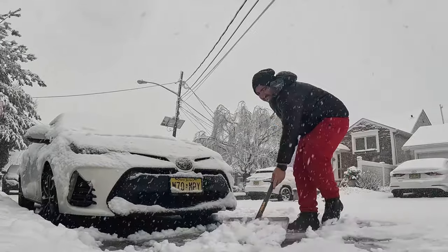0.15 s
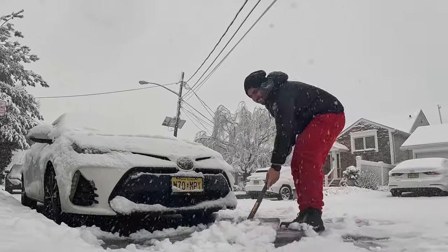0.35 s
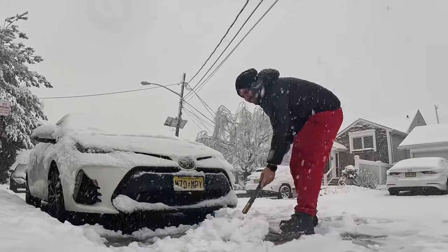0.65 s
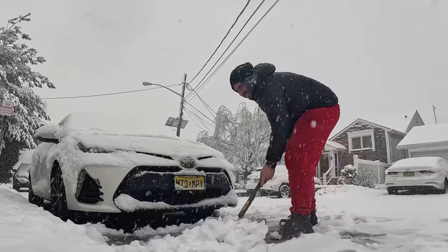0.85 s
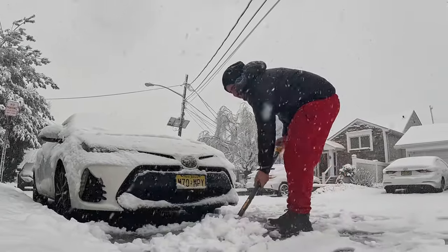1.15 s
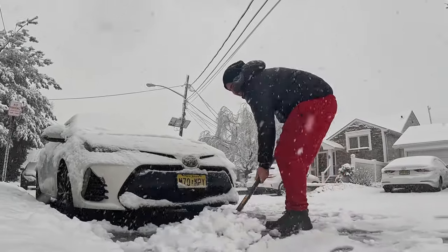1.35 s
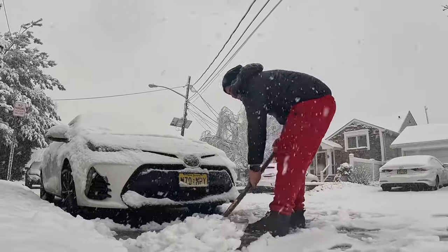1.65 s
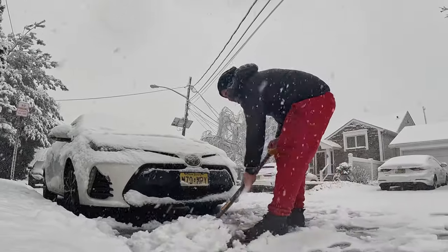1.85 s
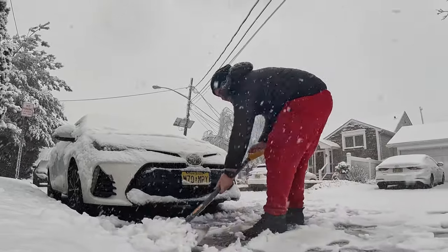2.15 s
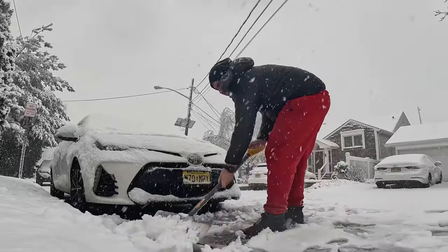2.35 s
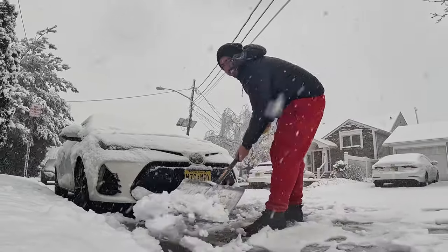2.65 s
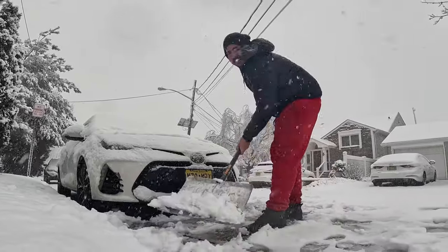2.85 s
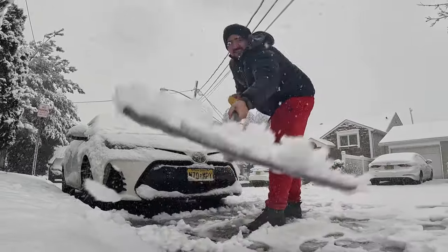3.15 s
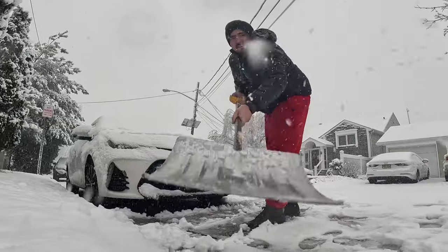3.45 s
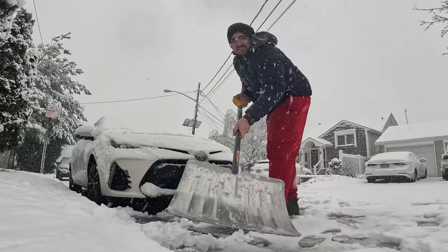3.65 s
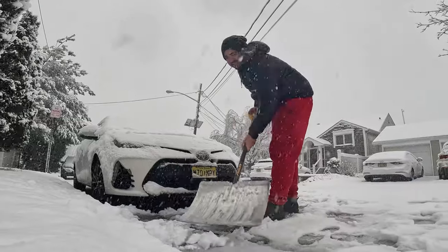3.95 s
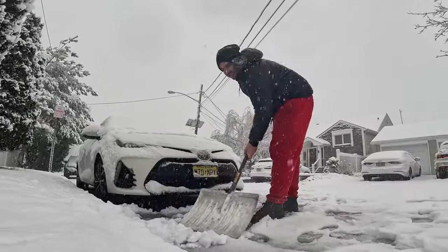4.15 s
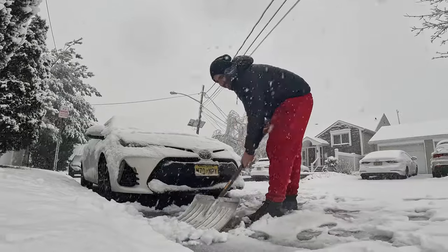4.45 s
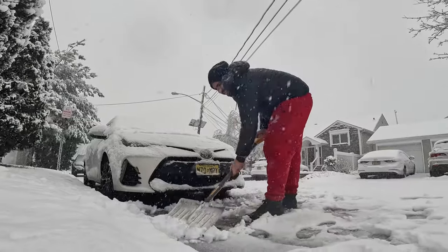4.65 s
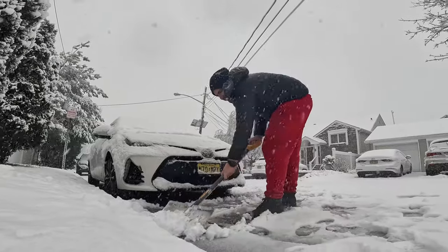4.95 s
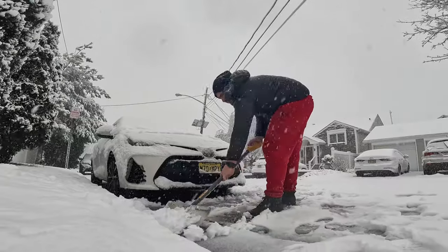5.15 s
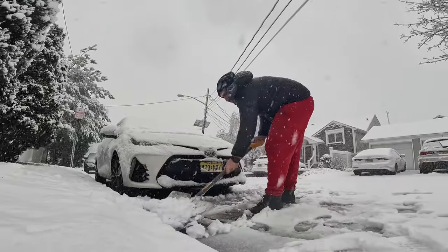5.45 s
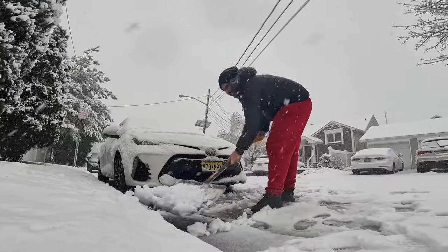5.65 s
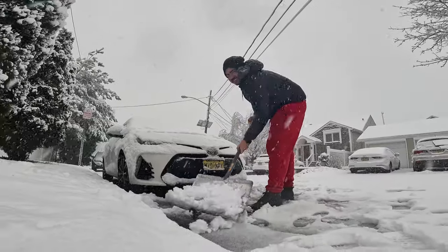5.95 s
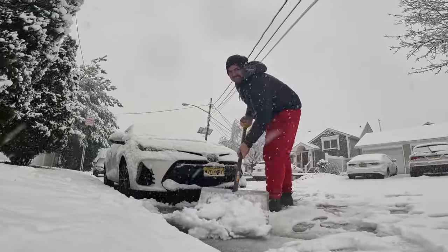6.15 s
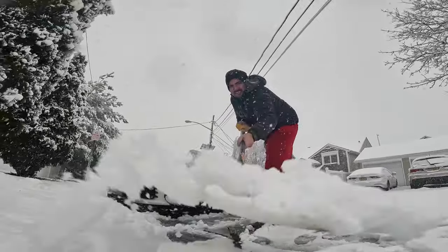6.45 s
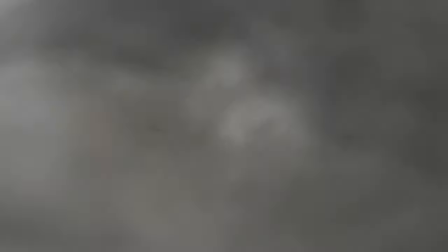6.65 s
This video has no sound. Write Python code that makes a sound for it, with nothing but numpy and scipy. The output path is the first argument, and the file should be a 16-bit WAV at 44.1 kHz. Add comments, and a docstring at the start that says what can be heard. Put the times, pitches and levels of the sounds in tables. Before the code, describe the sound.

A quiet street under snow, dry and without echo, with soft low traffic rumble and a thin far tyre hiss throughout. A wide shovel is already scraping at 0 s, its hollow blade juddering and grit crunching until about 0.5 s. A weaker, knocking drag follows at 0.55-0.9 s, trailing into faint snow hiss and small ticks. At 1.9-2.35 s a second strong scrape stutters and crunches with rapid catches. Thrown snow makes a soft airy swish at 3.0-3.4 s, with tiny ice crumbs pattering after. Mostly rumble remains until 4.5 s, when a brighter, rougher push grinds, knocks hard near 4.8 s and fades in a light drag, with one last sharp knock at 5.15 s. A distant car's hiss swells gently around 5.9 s. Snow hisses from 6.4 s, then at 6.7 s clumps thud close on the microphone, mostly right, bursting into brief crystalline fizz.

```python
"""On a quiet snowy street a wide snow shovel is pushed over pavement in three strokes, with lighter drags.
Its edge sticks, slips and catches, exciting the damped modes of the blade, and grinds out cracks on grit.
Loose snow hisses as shaped noise and is thrown twice; crumbs of ice tick as short resonances.
The second load thuds as force pulses on the microphone body and bursts into a fizz of grains.
Behind lie the rumble and tyre hiss of far traffic, both filtered noise."""
import sys
import numpy as np
from scipy import signal
from scipy.fft import rfft, irfft, next_fast_len
from scipy.io import wavfile
from scipy.ndimage import uniform_filter1d, map_coordinates

SR = 44100
rng = np.random.default_rng(int(sys.argv[2]) if len(sys.argv) > 2 else 0)


def wrap_up_sound(samples):
    """Save the sound to the file named by the first command line argument, as 16-bit audio."""
    columns = np.atleast_2d(samples).T
    # keep every value between -1 and 1, then stretch to whole-number steps
    tamed = np.clip(columns, -1, 1)
    steps = np.round(tamed * 32767).astype(np.int16)
    wavfile.write(sys.argv[1], SR, steps)


N = 299880

# Pushes and drags of the shovel: (start [s], attack [s], hold [s], release [s per 20 dB],
# sag over the hold [dB], judder before tilt [dB], nominal grit [dB], bareness of the edge [dB])
STROKES = [ (-0.02, 0.24, .19, .14, 7, -36.5, -49.5, -2), (0.54, .17, .15, .085, 2.5, -46, -56, 4),
           (1.894, .19, .235, .04, 5, -36, -49.5, -2.5), (4.49, .025, 0.092, 0.088, -2.5, -43, -48, 8.5),
           (4.578, 0.077, 0.1804, 0.032, 0.5, -38.5, -49, 1.5),
           (4.839, 0.025, 0.31, 0.082, 1, -48.5, -61, -5.5), ]
# Modes of the blade, damped by its load: (frequency [Hz], bandwidth [Hz], relative level [dB])
BLADE_MODES = [(132, 70, -11), (191.6, 50, -3.5), (301, 65, 0.5), (395, 95, 0), (495, 76, -4.5),
               (637, 139, -11), (927, 72, -15.5), (1002, 140, -17.5), (1276, 235, -16.5),
               (1417, 240, -15.5), (1875, 84, -26.5), (2390, 38, -33), (2820, 240, -30)]


def judder(slip_rate, shift_db, uneven_db, middle_hz, soft_hz):
    """Stick-slip friction: random slips drive the modes, whose strengths shift as the contact wanders."""
    slips = grains(slip_rate, spread_db=3.5) * amp(uneven_db * wobble(70))
    slips = signal.lfilter(*signal.butter(1, soft_hz, fs=SR), slips)  # slush softens each slip
    tilt_db_per_octave = 0.69 * bareness()  # a bare edge wakes the upper modes
    plain = tilted = 0
    for k, (hz, width_hz, db) in enumerate(BLADE_MODES):
        polarity = (-1) ** k
        mode = polarity * amp(db + shift_db * wobble(16)) * ring(slips, hz, width_hz)
        octaves = min(np.log2(hz / middle_hz), 2)
        plain = plain + mode
        tilted = tilted + mode * amp(tilt_db_per_octave * octaves)
    return level(STROKES, column=5) * tilted / plain.std()


# The edge catches on the pavement:
# (time [s], peak level [dB], contact time [ms], initial chatter relative to the first blow [dB])
CATCHES = [(0.159, -25, 0.2, -22), (0.622, -37, 0.23, -31), (0.720, -33, 0.34, -23.5),
           (0.838, -23.5, 0.49, -20), (0.880, -39, 0.12, -30), (2.204, -31, 0.24, -26),
           (2.230, -27.5, .22, -34), (2.252, -25, 0.95, -25), (2.269, -24.5, 1, -28),
           (4.573, -25, 0.066, -16.5), (4.596, -28.5, 0.097, -8), (4.662, -27, 0.27, -22),
           (4.682, -27, 0.47, -24), (4.703, -29, 0.39, -23), (4.832, -19.5, 1, -33),
           (5.1649, -20.5, 0.12, -27.5)]


def catches(vary_db, chatter_life):
    """Impact excitation: each catch knocks the blade; a shorter contact wakes its higher modes."""
    out, t = np.zeros(N), np.arange(SR // 8) / SR
    for s, db, contact_ms, chatter_db in CATCHES + snags(count=4, scatter_db=0, chatter_db=-25):
        first_blow = t == 0
        chatter = amp(chatter_db - 60 * t / chatter_life) * rng.standard_normal(len(t))
        # the edge is pressed in, then springs back
        pulse = np.gradient(push(contact_ms) ** 2)
        force = signal.fftconvolve(chatter + first_blow, pulse)[:len(t)]
        force = signal.lfilter(*signal.butter(1, 500, fs=SR), force)  # the wide sheet smooths the blow
        knock = np.zeros(len(t))
        for hz, width_hz, mode_db in BLADE_MODES:
            knock += amp(mode_db + vary_db * rng.standard_normal()) * ring(force, hz, width_hz)
        add(out, s, amp(db) * knock / np.abs(knock).max())
    return out


SNAG_DB, SNAG_MS = 2, 0.13  # peak above the stroke's judder level [dB], middle contact time [ms]


def snags(count, scatter_db, chatter_db):
    """Random asperity contacts while the edge is held down: small catches, in rows like CATCHES."""
    rows = []
    for start, attack, hold, _, sag_db, judder_db, _, _ in STROKES:
        for u, v, w in rng.random((count, 3)):
            peak_db = judder_db - sag_db * u + SNAG_DB + scatter_db * (2 * v - 1)
            contact_ms = SNAG_MS * 2 ** (2 * w - 1)
            rows.append((start + attack + hold * u, peak_db, contact_ms, chatter_db))
    return rows


# Lumps of ice crushed under the edge: (time [s], level of the burst [dB], time to fall by 60 dB [s])
CRUNCHES = [(0.117, -53, 0.049), (0.127, -31.5, 0.041), (0.157, -36.5, 0.045), (2.023, -38.5, .06),
            (2.069, -45.5, 0.043), (2.243, -43.5, 0.052), (2.322, -43.5, 0.04), (4.501, -40, .07),
            (4.513, -35.5, 0.037), (4.551, -37.5, 0.062), (4.679, -35.5, 0.042), (4.809, -41.5, 0.067),
            (4.933, -36.5, 0.041)]
# Spectrum of cracking grit: (frequency [Hz], relative density [dB per Hz])
GRIT_SPECTRUM = [(200, 0.5), (600, -0.5), (1500, -4.5), (2000, -2), (2900, -1), (4200, -6.5), (7000, -14),
                 (10000, -20.5), (12500, -29), (15000, -61)]


def grinding(grain_rate, clump_db, patchy_db, sizzle_hz):
    """Brittle fracture: grit cracks under the edge in clumps, and bursts where a lump of ice gives way."""
    t = np.arange(SR // 6) / SR
    force = level(STROKES, column=6) * amp(0.5) * unit(amp(clump_db * wobble(160)))
    for s, db, life in CRUNCHES:
        onset = 1 - np.exp(-t / 0.00075)
        add(force, s, amp(db - 60 * t / life) * onset)
    impulses = np.array([grains(grain_rate, spread_db=0) for _ in range(2)])
    cracks = spread(patchy(impulses, patchy_db), GRIT_SPECTRUM)
    # snow over the edge swallows the finest sizzle
    sizzle = filtered(cracks, lambda hz: hz ** 2 / (hz ** 2 + sizzle_hz ** 2))
    return force * (cracks + sizzle * (amp(0.22 * bareness()) - 1))


# Loose snow sliding off the blade or flying: (start [s], attack [s], hold [s], release [s per 20 dB],
# sag over the hold [dB], nominal hiss level [dB])
SLIDES = [ (0.88, 0.046, 0.0078, 0.27, 4, -62.5), (1.22, 0.14, 0.017, 0.039, 1, -64),
          (1.55, 0.26, 0.022, 0.53, 5, -62.5), (2.42, 0.052, 0.16, 0.55, 2.5, -62),
          (3.01, .155, .025, 0.053, -2.5, -47.5), (3.18, .15, .03, .06, -0.5, -46),
          (3.48, 0.084, 0.073, 0.19, 2, -69), (4.15, 0.13, 0.29, .05, -1.5, -69),
          (4.43, .07, .01, .03, 0, -56), (6.16, 0.15, 0.084, .1, 2.5, -65.5),
          (6.39, .09, 0.28, 0.11, 7, -54.5), ]
# Spectrum of powder snow: (frequency [Hz], relative density [dB per Hz])
POWDER_SPECTRUM = [(150, -12), (500, -4.5), (750, -7.5), (1100, -0.5), (2000, 0), (3200, 2.5), (5000, -1.5),
                   (7500, -4.5), (10500, -10), (15000, -30)]


def loose_snow(grain_rate, clump_db):
    """Granular noise: countless crystals rub on the blade and patter down as a soft hiss."""
    crystals = np.array([grains(grain_rate, spread_db=3.0) for _ in range(2)])
    clumping = amp(-1 + clump_db * wobble(70))
    return level(SLIDES, column=5) * clumping * spread(crystals, POWDER_SPECTRUM)


# Crumbs of ice landing nearby: (time [s], peak level [dB], pitch [Hz])
CRUMBS = [(1.248, -53, 5040), (2.031, -33.5, 5100), (2.313, -39, 7000), (2.321, -40, 7050),
          (3.578, -40.5, 8800), (3.612, -45.5, 8100), (5.352, -51, 5500), (5.731, -55, 8500),
          (6.636, -45.5, 3530), (6.707, -23.5, 2580)]


def crumbs(life, width_share):
    """Damped resonance: a decaying crack through two equal broad resonators makes a tiny pitched tick."""
    out, t = np.zeros((2, N)), np.arange(SR // 20) / SR
    for s, db, hz in CRUMBS + trickle(count=5, scatter_octaves=0.71):
        shared, separate = rng.standard_normal(len(t)), rng.standard_normal((2, len(t)))
        crack = (shared + 0.5 * separate) * amp(-60 * t / life)
        width_hz = width_share * hz
        tick = ring(ring(crack, hz, width_hz), hz, width_hz)
        add(out, s, amp(db) * tick / np.abs(tick).max())
    return out


# Finer crumbs trickling down around a throw and after a knock:
# (start [s], length [s], peak level at the start [dB])
TRICKLES = [(2.803, .24, -58), (3.55, 0.24, -60), (5.192, .18, -56.5)]
TRICKLE_HZ, TRICKLE_FADE_DB = 6530, 3  # middle pitch, loss over the whole length


def trickle(count, scatter_octaves):
    """Random arrivals: fine crumbs at chance moments, later ones fainter, in rows like CRUMBS."""
    rows = []
    for s, length, db in TRICKLES:
        for u, w in rng.random((count, 2)):
            hz = TRICKLE_HZ * 2 ** (scatter_octaves * (2 * w - 1))
            rows.append((s + length * u, db - TRICKLE_FADE_DB * u, hz))
    return rows


# Clumps striking the microphone body: (time [s], peak before left-right gain [dB], contact time [ms])
CLUMPS = [(6.637, -39, 0.4), (6.702, -28.5, 0.31), (6.707, -37, 0.049), (6.704, -25, 8.2),
          (6.720, -27, 4.1)]
# The load bursting over the microphone: (start [s], attack [s], hold [s], release [s per 20 dB],
# sag over the hold [dB], fizz before left-right gain [dB])
BURST = [(6.685, 0.018, 0.044, 0.053, 3.5, -40), (6.78, .015, .01, .03, 0, -43)]
# Spectrum of the bursting spray: (frequency [Hz], relative density [dB per Hz])
SPRAY_SPECTRUM = [(150, 12), (550, 4.5), (850, -1), (3000, -5), (4500, -1), (6500, 0), (8000, -3.5),
                  (10500, -9.5), (15000, -26)]


def splat(left_db, right_db, clump_db):
    """Soft impact: wet clumps thud mostly at the right port and burst into a granular fizz of crystals."""
    thuds = np.zeros(N)
    for s, db, contact_ms in CLUMPS:
        thud = np.gradient(push(contact_ms) ** 3)
        add(thuds, s, amp(db) * thud / np.abs(thud).max())
    crystals = np.array([grains(7000, spread_db=5.5) for _ in range(2)])
    clumping = amp(clump_db * wobble(150))
    fizz = level(BURST, column=5) * clumping * spread(crystals, SPRAY_SPECTRUM)
    return thuds * amp([[left_db], [right_db]]) + fizz * amp([[-2], [1]])


# Course of the traffic rumble: (time [s], nominal level [dB])
TRAFFIC = [(0.0, -51.5), (3.23, -54.5), (4.65, -48.5), (5.0, -53.5), (5.39, -51), (6.6, -49.5)]
# Spectrum of the rumble: (frequency [Hz], relative density [dB per Hz])
RUMBLE_SPECTRUM = [(10, -11), (38, 0.5), (55, 0), (85, 0), (130, -6.5), (200, -12), (300, -22.5),
                   (450, -38.5), (800, -51), (2000, -88)]
# Spectrum of tyres on slush: (frequency [Hz], relative density [dB per Hz])
TYRE_SPECTRUM = [(200, -15), (500, -15), (820, -8.5), (1050, -0.5), (1350, 1), (2200, -5.5), (4000, -12.5),
                 (7000, -18.5), (10500, -25.5), (15000, -37)]
TYRES_DB = -73.5  # steady hiss of far tyres, before left-right gain
PASS_S, PASS_WIDTH_S, PASS_DB = 5.92, 0.33, -66.5  # a far car: nearest moment, half width, its tyres' level


def street(waver_db, left_db):
    """Distance law: far traffic rumbles, and a wide, thin tyre hiss swells as a car nears and recedes."""
    t = np.arange(N) / SR
    rumble_db = np.interp(t, *np.transpose(TRAFFIC)) + 1.84 + waver_db * wobble(5.9)
    rumble = amp(rumble_db) * spread(rng.standard_normal((2, N)), RUMBLE_SPECTRUM)
    passing = amp(PASS_DB) / np.hypot(1, (t - PASS_S) / PASS_WIDTH_S)
    hiss = spread(rng.standard_normal((2, N)), TYRE_SPECTRUM, focus=0.67)
    tyres = np.hypot(amp(TYRES_DB), passing) * hiss
    return rumble + tyres * amp([[left_db], [-left_db]])


def bareness():
    """Contact stiffness: the edge's bite [dB]; snow under it mutes, bare pavement brightens."""
    weights = np.array([swell(*row[:5]) for row in STROKES]) + 1e-9
    return np.array(STROKES)[:, -1] @ weights / weights.sum(axis=0)


ATTACK_POWER = 1.127  # the strength of a movement grows as this power of time


def swell(start, attack, hold, release, sag_db):
    """Amplitude envelope: a movement gathers pace, sags while held, then falls 20 dB per release time."""
    t = np.arange(0, N, 32) / SR - start
    rise = np.clip(t / attack, 0, 1) ** ATTACK_POWER
    held = np.clip((t - attack) / hold, 0, 1)
    after = np.maximum(t - attack - hold, 0)
    gain = rise * amp(-sag_db * held - 20 * after / release)
    return np.interp(np.arange(N) / SR - start, t, gain)


def level(movements, column):
    """Power addition: the swells of a table of movements, each at the dB in that column, as one gain."""
    return np.sqrt(sum((amp(row[column]) * swell(*row[:5])) ** 2 for row in movements))


def push(contact_ms):
    """Contact mechanics: the force of one blow rises quickly, peaks at contact_ms and releases slower."""
    u = np.arange(SR // 8) / SR * 1000 / contact_ms
    return u * np.exp(-u)


def ring(x, hz, width_hz):
    """Resonance: one damped mode driven by x."""
    return signal.lfilter(*signal.iirpeak(hz, hz / width_hz, SR), x)


def grains(rate, spread_db):
    """Shot noise: random impulses of uneven size and either sign, rate a second, rms 1."""
    hits = rng.random(N) < rate / SR
    signs = rng.choice([-1, 1], N)
    sizes = amp(spread_db * np.clip(rng.standard_normal(N), -2, 2))
    return unit(hits * signs * sizes)


def patchy(x, depth_db):
    """Spectral fluctuation: every few ms other frequencies stand out, as fragments differ in pitch."""
    z = signal.stft(x, nperseg=256)[2]
    field = uniform_filter1d(rng.standard_normal(z.shape[1:]), size=3, axis=0)  # over frequency
    field = uniform_filter1d(field, size=4, axis=1)  # over time
    return signal.istft(z * amp(depth_db * unit(field)), nperseg=256)[1][:, :N]


# Likeness of the two channels at full focus: (frequency [Hz], left-right correlation [1])
LIKENESS = [(30, 0.99), (120, 1), (600, 0.97), (1400, 1), (3100, 0.78), (7000, 1), (14000, 0.95)]


def spread(pair, spectrum, focus=1):
    """Interchannel coherence: unrelated signals become coloured stereo of rms 1; less focus is wider."""
    def turn(hz):
        return np.arccos(np.clip(focus * along(LIKENESS, hz), -1, 1)) / 2

    def response(hz):
        return amp(along(spectrum, hz)) * [np.cos(turn(hz)), np.sin(turn(hz))]

    mid, side = filtered(pair, response)
    return unit(np.array([mid + side, mid - side]))


def wobble(rate):
    """Band-limited fluctuation: a smooth random curve, rate knots a second."""
    coarse = np.arange(0, N, 32)
    knots = rng.standard_normal(2000)
    return np.interp(np.arange(N), coarse, map_coordinates(knots, [coarse * rate / SR]))


def filtered(x, response):
    """Linear filtering: the spectrum of x times a complex response of frequency."""
    n = x.shape[-1]
    m = next_fast_len(n + SR // 10)
    return irfft(rfft(x, m) * response(np.fft.rfftfreq(m, 1 / SR)), m)[..., :n]


def along(points, hz):
    """Logarithmic frequency scale: interpolates (frequency [Hz], value) points."""
    f, v = np.transpose(points)
    return np.interp(np.log(hz + 1), np.log(f), v)


def add(track, s, sound):
    """Superposition: mixes a sound into a track, in place, at time s."""
    part = track[..., round(s * SR):][..., :sound.shape[-1]]
    part += sound[..., :part.shape[-1]]


def amp(db):
    """Level law: decibels to amplitude gain."""
    return 10 ** (np.asarray(db) / 20)


def unit(x):
    """Normalisation: x scaled to rms 1."""
    return x / np.sqrt(np.mean(x ** 2) + 1e-20)


def scene():
    """Absorption: snow swallows all echoes, so the sources simply add up dry."""
    blade = judder(slip_rate=800, shift_db=1.5, uneven_db=3, middle_hz=358, soft_hz=3500)
    blade = blade + catches(vary_db=6.5, chatter_life=0.056)
    grit = grinding(grain_rate=2400, clump_db=2.1, patchy_db=2.5, sizzle_hz=5500)
    snow = loose_snow(grain_rate=14000, clump_db=1.96)
    ice = crumbs(life=0.018, width_share=0.57)
    load = splat(left_db=-7.0, right_db=3.0, clump_db=1.5)
    return blade + grit + snow + ice + load + street(waver_db=1.0, left_db=1.6)


# Colour difference of the two ports: (frequency [Hz], left minus right [dB])
PORT_BALANCE = [(150, -0.26), (400, -1.5), (800, -3), (2400, -1.5), (4400, -1), (8000, -0.5), (14000, 6)]
TOP_HZ = 15400  # band limit


def record(dry):
    """Interaural-style cues: the ports differ in colour, the left hears later; the band ends at TOP_HZ."""
    sides, lag_s = np.array([[0.5], [-0.5]]), 1.2e-5  # half of each difference goes to either port

    def response(hz):
        delay = np.exp(-2j * np.pi * hz * lag_s * sides)
        return amp(sides * along(PORT_BALANCE, hz)) * delay * (hz < TOP_HZ)

    return filtered(dry, response)


dry = scene()
out = record(dry)
wrap_up_sound(out)
```